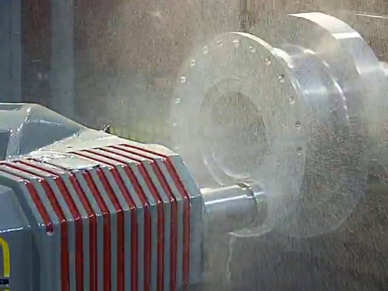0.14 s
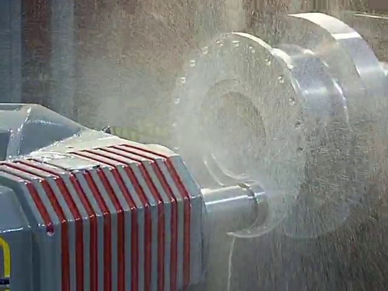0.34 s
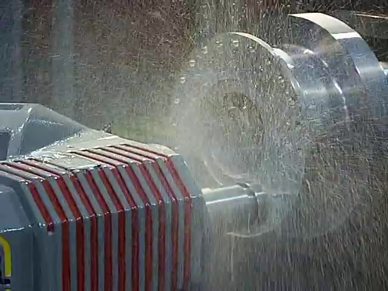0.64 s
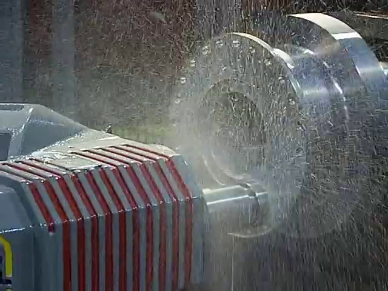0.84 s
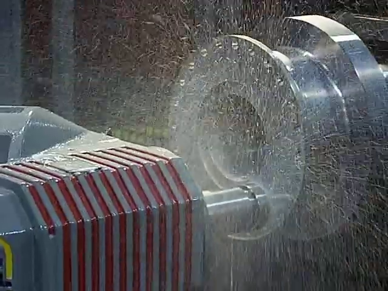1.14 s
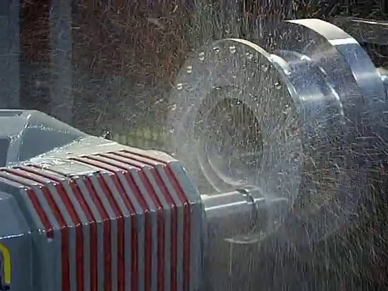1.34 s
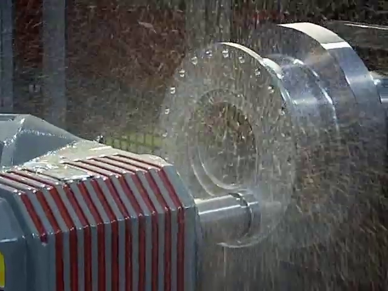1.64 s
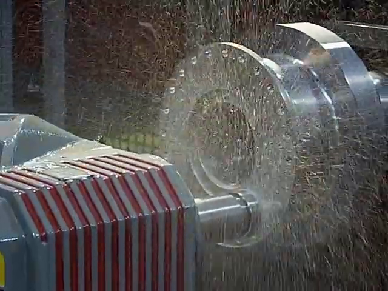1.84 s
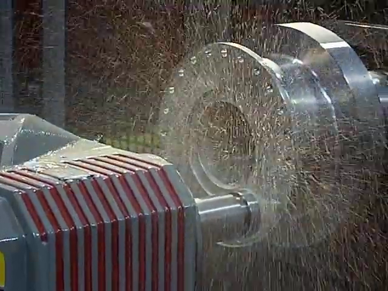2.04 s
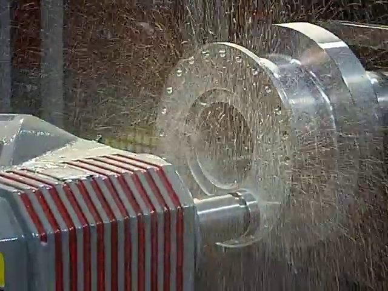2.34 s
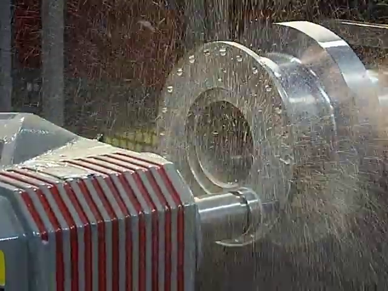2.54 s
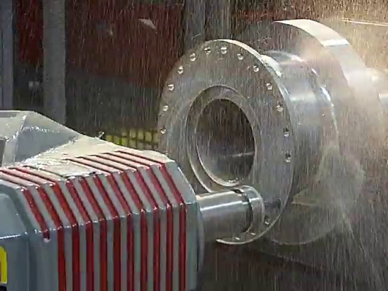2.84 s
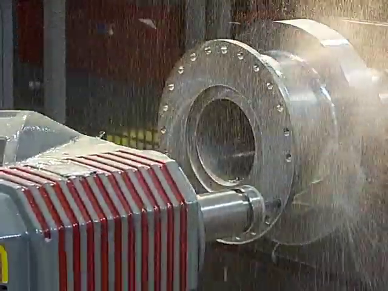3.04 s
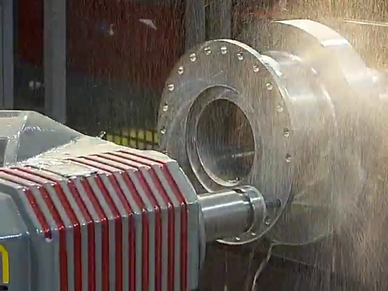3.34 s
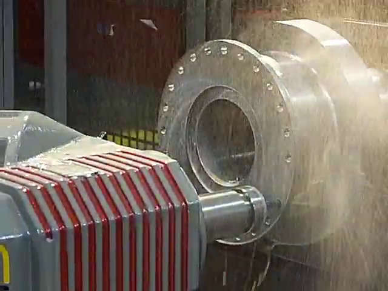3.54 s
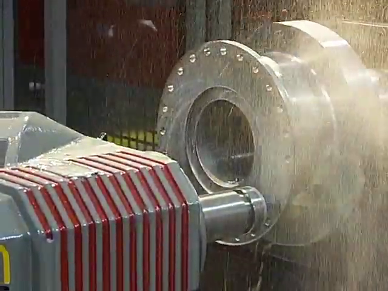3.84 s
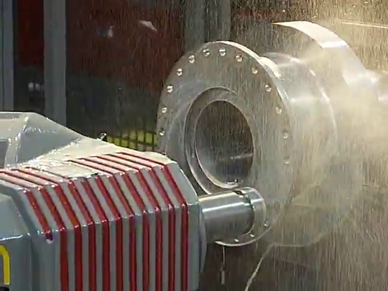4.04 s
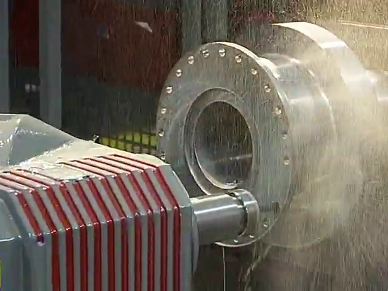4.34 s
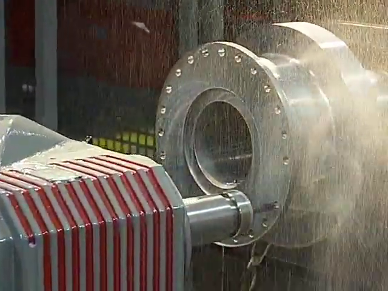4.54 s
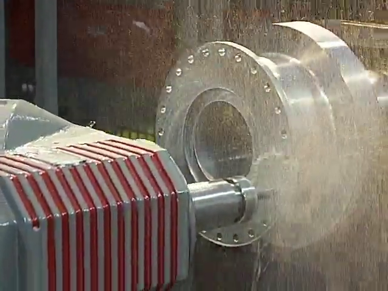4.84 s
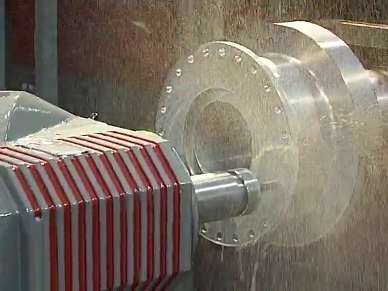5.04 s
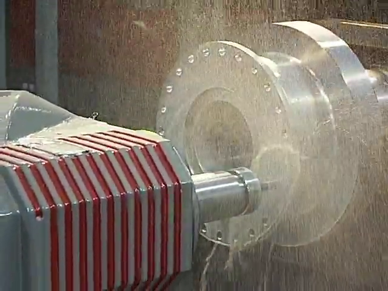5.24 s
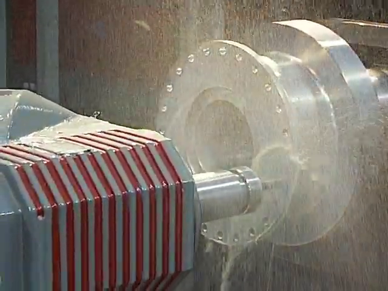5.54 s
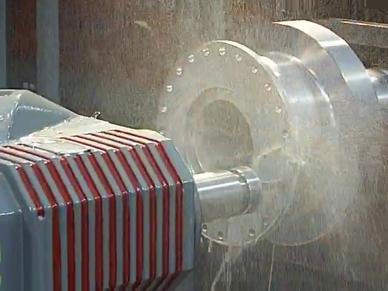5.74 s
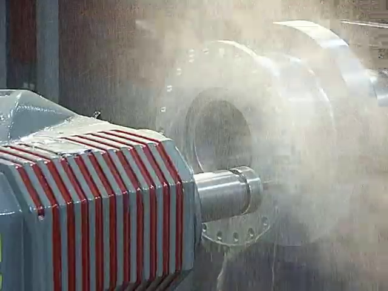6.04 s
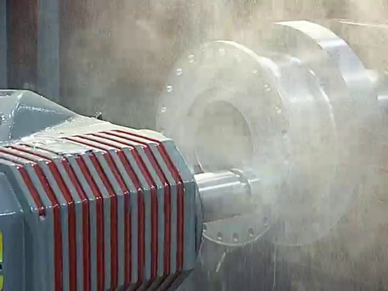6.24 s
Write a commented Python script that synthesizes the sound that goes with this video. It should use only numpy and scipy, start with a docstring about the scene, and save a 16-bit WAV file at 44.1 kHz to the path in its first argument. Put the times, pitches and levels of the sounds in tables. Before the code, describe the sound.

Close to a machining spindle in a workshop, bright coolant spray hisses over a broad roar, low thrum and steady high whine. Rough drilling tones pulse rapidly, with faint whistles early and scattered chip ticks. Just after two seconds a short metallic screech and a cluster of sharp clicks mark the breakthrough. The cutting tones vanish, motor hum emerges, and the noise later jumps much louder, falling back at the end.

```python
"""A spindle drills through a steel flange: rough cutting tones, then a screech of ringing steel as it breaks through.
Coolant spray hisses and pulses with the turning tool; edges catch and chips ping as short noise bursts into steel modes.
Behind it a drive whines, a whistle comes in bursts, and the shop roars, thrums and hums: shaped noise and wavering sines.
Noises and ringing steel pass a microphone housing with a notch and a treble peak. Puffs of air thump and dull the
steady bed, whose level wanders, rising sharply for a while in the second half."""
import sys
import numpy as np
from scipy import signal
from scipy.fft import rfft, irfft, next_fast_len
from scipy.io import wavfile

SR = 44100
rng = np.random.default_rng(int(sys.argv[2]) if len(sys.argv) > 2 else 0)


def materialize(psi):
    """Save the field psi as 16-bit PCM at rate SR to the path in sys.argv[1].

    A 1-D psi becomes a single channel; in a 2-D psi each row is a channel.
    """
    bounded = np.clip(np.atleast_2d(psi).T, -1, 1)
    quanta = np.round(bounded * 32767).astype(np.int16)
    wavfile.write(sys.argv[1], SR, quanta)


N = 281358
T = np.arange(N) / SR

# Rough tones the drill sings in the steel. Each row: pitch in Hz, level in dB before the cutting gain.
CUTTING_TONES = [(44.4, -11), (167.3, -20), (347.5, -14), (599, -12), (932, -11.5), (844, -17.5),
                 (1112, -15), (1347, -23.5), (1340, -14.5), (1512, -15.5)]
# Screech of the breakthrough. Each row: time in seconds, rms of the shrill ring in dB, rasp centre in Hz.
SCREECH_GLIDE = [(2.26, -58, 3000), (2.285, -39, 3000), (2.31, -33, 3090), (2.35, -22, 3365),
                 (2.39, -20, 3450), (2.44, -23, 3250), (2.5, -26, 3070), (2.535, -32.5, 3000),
                 (2.62, -36.5, 2920), (2.7, -60, 2850)]
# Two bursts of the rasp. Each row: centre in seconds, rms at the crest in dB, length at half height in seconds.
RASP_BURSTS = [(2.343, -39, 0.097), (2.49, -39.5, 0.14)]
# The cutting edges catch. Each row: start in seconds, peak level in dB, centre of the colour in Hz.
EDGE_CATCHES = [(2.2816, -22, 7300), (2.3081, -24, 7200), (2.3465, -17, 7000), (2.3545, -11, 7900),
                (2.377, -10, 7800), (2.3947, -7, 7900), (2.4163, -8, 8000)]
# Single chips and drops strike the guard. Each row: start in seconds, peak level in dB, centre of the colour in Hz.
CHIP_STRIKES = [(.648, -25, 7300), (1.0657, -21, 7100), (1.4726, -26, 7300), (1.7137, -22, 7300),
                (2.1441, -29, 7400), (4.2168, -14, 7400), (4.3445, -17, 7450)]
# Modes of tool and flange. Each row: pitch in Hz, relative level in the air in dB,
# time in seconds to ring down 60 dB before extra damping.
STEEL_MODES = [(5240, -4.5, .021), (6100, 0, .031), (6000, -11, .031), (6630, 1, .13), (7480, 4.5, 0.036),
               (7010, 7.5, 0.048), (6860, -7.5, 0.078), (7600, 1, 0.067), (7750, -7, 0.031),
               (7790, -2, 0.077), (8200, -16, 0.02), (8540, -3, .081), (8160, -7, 0.022), (9100, 2, .021)]
# Noise spectra in the air, only their shape counts. Each row: frequency in Hz, density in dB per Hz.
SPRAY_SPECTRUM = [(2600, -29), (4050, -2), (4650, -3.5), (5350, -4.5), (6450, -4), (7250, -7), (7750, -9.5),
                  (8250, -14.5), (8550, -13.5), (8850, -9.5), (9100, -29), (9600, -55.5)]
ROAR_SPECTRUM = [(90, -31), (200, -9), (420, 0), (650, 0), (1000, 1.5), (1300, -2), (1600, -4), (2600, -6),
                 (3400, -5), (4000, -12), (4600, -17.5), (6000, -33.5)]
THRUM_SPECTRUM = [(40, -34.5), (75, -8.5), (110, -10), (160, 0.5), (200, -8), (300, -9), (420, -16.5)]
BUFFET_SPECTRUM = [(8, -8.5), (18, 4.5), (40, 3.5), (65, -0.5), (110, -18)]
# Short spits of coolant hiss. Each row: centre in seconds, rms at the crest in dB, pitch centre in Hz,
# length at half height in seconds.
COOLANT_SPITS = [(2.222, -45, 5100, .018), (2.402, -46, 5200, .02), (2.443, -46, 5300, .01)]
# Bursts of a thin whistle. Each row: centre in seconds, crest level in dB against the roar.
WHISTLE_BURSTS = [(.545, -17), (.655, -13), (.795, -10.5), (.925, -10)]
# Motors and pumps of the shop. Each row: pitch in Hz, level in dB before the hum gain.
SHOP_HUM = [(59, -17), (78, -19), (118, -13), (152, -11), (180, -15), (240, -11), (300, -18), (327, -17),
            (358, -13), (475, -13), (712, -17), (864, -18), (985, -20), (1077, -18), (1164, -15),
            (1310, -16), (1360, -19), (1480, -21), (1500, -20), (1767, -20), (2132, -24), (2935, -23),
            (3914, -38), (4565, -38), (5545, -26)]
# Puffs of air that press on the microphone and deafen it for a moment. Each row: centre in seconds, depth in dB,
# width at half depth in seconds.
AIR_PUFFS = [(1.059, 7, .012), (1.205, 4, 0.019), (1.333, 4.5, 0.019), (1.405, 4, 0.02), (1.463, 4.5, .025),
             (1.56, 0, 0.018), (1.664, 4, .02), (1.788, 8, 0.042), (1.855, 6, 0.029), (1.905, 8, 0.026),
             (1.957, 5, 0.016), (2.002, 6, 0.023), (2.058, 2, 0.016), (2.26, 4, 0.037), (3.75, 1.5, .03),
             (4.158, 3, .025), (4.39, 3, 0.025), (4.46, 1, 0.019), (4.55, 2.5, 0.018), (4.74, 3.5, 0.034),
             (5.05, 0.5, 0.021), (5.992, 4, 0.025)]
# Balance of the bed. Each row: time in seconds, then spray, whine and thrum in dB against the roar.
BALANCE = [(0, 1.5, -5, -8), (1, 4.5, -7.5, -6.5), (1.6, 4, -5.5, -10.5), (2.3, 4.5, -6, -12),
           (2.6, 3, -4, -9.5), (4.3, 4, -3, -5.5), (5, 3, -7, -4.5), (5.6, 2.5, -5, -6),
           (6.38, 1.5, -6, -14.5)]
# Slow level of the steady bed. Each row: time in seconds, level of the roar in dB.
BED_LEVEL = [(0, -40), (.1, -42), (.85, -42), (1.4, -42.5), (1.6, -45), (1.95, -42), (2.2, -39),
             (2.4, -40.5), (2.52, -39), (3.43, -39.5), (3.62, -29.5), (4.65, -30), (4.85, -28),
             (6.235, -28), (6.25, -38), (6.322, -35), (6.334, -42), (6.38, -42.5)]
# Throb of the bed, twice a turn. Each row: time in seconds, depth in dB (negative turns it over).
THROB_DEPTH = [(0, 2), (.7, 0.6), (1.05, 1.5), (1.3, -0.5), (1.5, 3.5), (1.76, 3.5), (1.9, 1), (2.3, 0.3),
               (6.38, 0.5)]

SPINDLE_HZ, THROB_START_S = 23.27, 0.03
# The drill cuts until it breaks through; then its tones die and the shop hum stands out.
THROUGH_S, THROUGH_FADE_S = 2.45, 0.16
CUTTING_DB, HUM_CUTTING_DB, HUM_FREE_DB = -0.5, -4, -1
# A lighter graze comes just before each catch.
GRAZE_LEAD_S, GRAZE_DB, GRAZE_HZ = 0.004, -7, 7250
# Jets from the drill tip sweep round about once a turn: depth in the spray, phase in radians.
SWEEP_HZ, SWEEP_PHASE, SWEEP_DB = 23.33, -2.8, 1
WHINE_HZ, WHINE_OCTAVE_DB = 2897.9, -17  # octave against the fundamental
WHISTLE_HZ, WHISTLE_S = 2248, 0.09
BUFFET_DB = -17  # against the roar
# Gain for a puff 1 dB deep, and the band in which its thump is heard.
THUMP_DB, THUMP_BOTTOM_HZ, THUMP_TOP_HZ = -53, 7, 40
FLUTTER_DB, FLUTTER_HZ = 0.58, 14
NOTCH_HZ, NOTCH_WIDTH_HZ, PEAK_HZ, PEAK_WIDTH_HZ = 4200, 150, 7550, 1100
CUTOFF_HZ = 9330


def from_db(db):
    """Decibels to gain."""
    return np.exp(np.asarray(db) * (np.log(10) / 20))


def rms_one(x):
    """Scale to rms 1."""
    return x / np.sqrt(np.mean(x ** 2) + 1e-20)


def in_time(rows):
    """Columns of a table as curves, one value a sample."""
    s, *columns = np.transpose(rows)
    return [np.interp(T, s, column) for column in columns]


def bell(s, width):
    """A bump in time, as wide as given at half its height."""
    out = np.zeros(N)
    near = slice(max(round((s - 3 * width) * SR), 0), round((s + 3 * width) * SR))
    out[near] = np.exp(-4 * np.log(2) * ((T[near] - s) / width) ** 2)
    return out


def drift(rate_hz):
    """Slow random curve of spread 1: smoothed noise at every 40th sample, joined by straight lines."""
    r = np.exp(-80 * np.pi * rate_hz / SR)
    raw = rng.standard_normal(N // 40 + 2002)
    slow = signal.lfilter([1], [1, -2 * r, r * r], raw)[2000:]  # the filter has settled
    slow = rms_one(slow - slow.mean())
    between = slow[:-1, None] + np.diff(slow)[:, None] * np.arange(40) / 40
    return between.ravel()[:N]


def root_pair(hz, width_hz):
    """A pair of poles or zeros, gain 1 at zero frequency."""
    r = np.exp(-np.pi * width_hz / SR)
    pair = np.array([1, -2 * r * np.cos(2 * np.pi * hz / SR), r * r])
    return pair / pair.sum()


def housing(x):
    """The cavity before the microphone cancels one band and lifts a higher one."""
    return signal.lfilter(root_pair(NOTCH_HZ, NOTCH_WIDTH_HZ), root_pair(PEAK_HZ, PEAK_WIDTH_HZ), x)


def tone(hz, wobble, waver_hz):
    """A sine, rms 1 before its level wobbles (as a share); its pitch wavers too."""
    cycles = np.cumsum(hz + waver_hz * drift(2.727)) / SR + rng.random()
    phase = (2 * np.pi * (cycles - np.floor(cycles))).astype(np.float32)
    return np.sqrt(2) * np.sin(phase) * (1 + wobble * drift(4.0))


def noise(spectrum, patchy_db, rate_hz, count, grain_db=0):
    """Noise of a spectrum in overlapping bands that flicker each on their own; rms 1 at the microphone."""
    size = next_fast_len(N)
    log_hz = np.log(np.arange(size // 2 + 1) * SR / size + 1e-3)
    hz, db = np.transpose(spectrum)
    grain = from_db(grain_db * rng.standard_normal(size))  # sample by sample unevenness
    white = rng.standard_normal(size) * grain
    shaped = rfft(white) * from_db(np.interp(log_hz, np.log(hz), db, -120, -120))
    place = np.interp(log_hz, np.log(hz[[0, -1]]), [0, count - 1])
    total = 0
    for k in range(count):
        share = np.clip(1 - abs(place - k), 0, 1)
        band = irfft(shaped * share, size)[:N]
        total = total + band * from_db(patchy_db * drift(rate_hz))
    return rms_one(housing(total))


def noise_band(hz, half_width_hz):
    """Noise round a centre that may move; rms 1."""
    lowpass = signal.butter(4, half_width_hz, fs=SR, output="sos")
    wobble = signal.sosfilt(lowpass, rng.standard_normal((2, N)))
    phase = 2 * np.pi * np.cumsum(hz + np.zeros(N)) / SR
    return rms_one(wobble[0] * np.cos(phase) + wobble[1] * np.sin(phase))


def steel(clicks, damping=1.0):
    """Clicks set the modes of the steel ringing, damping shortens them; heard at the microphone."""
    out = 0
    for k, (hz, db, t60) in enumerate(STEEL_MODES):
        r = from_db(-60 * damping / (t60 * SR))
        w = 2 * np.pi * hz / SR
        poles = [1, -2 * r * np.cos(w), r * r]
        ring = signal.lfilter([np.sin(w) / 2, 0, -np.sin(w) / 2], poles, clicks + 1e-18)
        out = out + (-1) ** k * from_db(db) * ring  # signs alternate from mode to mode
    return housing(out)


def blows(events, contact_s, damping, spread):
    """Each blow is a dying burst of contact noise into the steel, coloured by a band and scaled to its peak."""
    out, size = np.zeros(N), 1500
    decay = np.exp(-np.arange(size) / (contact_s * SR))
    fade = np.hanning(2 * size)[size:]
    for s, db, hz in events:
        burst = rng.standard_normal(size) * decay
        colour = signal.butter(2, [hz / spread, hz * spread], "band", fs=SR, output="sos")
        ring = signal.sosfilt(colour, steel(burst, damping)) * fade
        start = round(s * SR)
        out[start:start + size] += from_db(db) * ring / abs(ring).max()
    return out


def cutting(load):
    """The loaded drill sings in the steel on rough, wavering tones that die as the load goes."""
    tones = sum(from_db(db) * tone(hz, 0.3, 6.0) for hz, db in CUTTING_TONES)
    return from_db(CUTTING_DB) * load * tones


def screech():
    """Dense uneven slips of the cutting edges ring the steel, over a lower, gliding, broken rasp."""
    shrill_db, rasp_hz = in_time(SCREECH_GLIDE)
    span = slice(round(SCREECH_GLIDE[0][0] * SR), round(SCREECH_GLIDE[-1][0] * SR))
    sizes_db = 2.0 * np.minimum(rng.exponential(1, N), 4)
    slips = (rng.random(N) < 0.15) * from_db(sizes_db) * rng.choice([-1, 1], N)
    shrill = np.zeros(N)
    shrill[span] = rms_one(steel(slips[span], damping=2.5))
    shrill = shrill * from_db(1.5 * drift(90))
    rasp = noise_band(rasp_hz, 300) * from_db(2.5 * drift(90))
    rasp_gain = sum(from_db(db) * bell(s, length) for s, db, length in RASP_BURSTS)
    return from_db(shrill_db) * shrill + rasp_gain * rasp


def catches():
    """The cutting edges catch in heavily damped steel, each time after a lighter graze."""
    grazes = [(s - GRAZE_LEAD_S, db + GRAZE_DB, GRAZE_HZ) for s, db, hz in EDGE_CATCHES]
    return blows(EDGE_CATCHES + grazes, contact_s=0.00053, damping=7.9, spread=1.12)


def chips():
    """Chips and drops strike the guard: shorter contacts, dull ringing, wider colour."""
    return blows(CHIP_STRIKES, contact_s=0.0004, damping=11.0, spread=1.5)


def spray(spray_db):
    """Grainy coolant hiss that swells as the jets sweep round and flickers quickly."""
    sweep_db = SWEEP_DB * np.cos(2 * np.pi * SWEEP_HZ * T + SWEEP_PHASE)
    gain = from_db(spray_db + sweep_db + 0.89 * drift(55))
    return gain * noise(SPRAY_SPECTRUM, patchy_db=0.82, rate_hz=11, count=6, grain_db=3.0)


def spits():
    """The coolant spits short bumps of narrow hiss, each moved up to its own pitch."""
    hiss = noise_band(0, 380)
    out = np.zeros(N)
    for s, db, hz, length in COOLANT_SPITS:
        carrier = np.sqrt(2) * np.cos(2 * np.pi * hz * T)
        out += from_db(db) * bell(s, length) * hiss * carrier
    return out


def whine():
    """The drive whines on a nearly steady tone with a weak octave."""
    octave = tone(2 * WHINE_HZ, 0.1, 0.19)
    return tone(WHINE_HZ, 0.063, 0.21) + from_db(WHINE_OCTAVE_DB) * octave


def whistle():
    """One thin wavering sine, opened in short bell-shaped bursts."""
    gain = sum(from_db(db) * bell(s, WHISTLE_S) for s, db in WHISTLE_BURSTS)
    return gain * tone(WHISTLE_HZ, 0.2, 5.0)


def roar():
    """Broad, even noise of the shop: the reference for the balance."""
    return noise(ROAR_SPECTRUM, patchy_db=0.2, rate_hz=12, count=8)


def thrum():
    """Low noise that swells slowly and unevenly from band to band."""
    return noise(THRUM_SPECTRUM, patchy_db=2.7, rate_hz=1.7, count=3)


def buffet():
    """The lowest noise, buffeting unevenly."""
    return from_db(BUFFET_DB) * noise(BUFFET_SPECTRUM, patchy_db=2.0, rate_hz=3, count=2)


def hum(load):
    """Motors and pumps sound as many wavering sines, stronger once the drill is through."""
    gain = from_db(HUM_FREE_DB + (HUM_CUTTING_DB - HUM_FREE_DB) * load)
    return gain * sum(from_db(db) * tone(hz, 0.3, 2.5) for hz, db in SHOP_HUM)


def pressure():
    """How hard the air presses on the microphone, as dB of deafening."""
    return sum(depth_db * bell(s, width) for s, depth_db, width in AIR_PUFFS)


def thumps():
    """The air pressure itself, heard in a low band as soft thumps."""
    band = signal.butter(1, [THUMP_BOTTOM_HZ, THUMP_TOP_HZ], "band", fs=SR, output="sos")
    return from_db(THUMP_DB) * signal.sosfilt(band, pressure())


def level():
    """Gain of the steady bed: slow level, throb twice a turn, deafening by puffs and a common flutter."""
    slow_db, = in_time(BED_LEVEL)
    depth_db, = in_time(THROB_DEPTH)
    throb_db = -depth_db * np.cos(4 * np.pi * SPINDLE_HZ * (T - THROB_START_S))
    return from_db(slow_db + throb_db - pressure() + FLUTTER_DB * drift(FLUTTER_HZ))


def scene():
    """The steady bed under its level, with the screech, blows, spits and thumps on top."""
    load = np.clip(1 - (T - THROUGH_S) / THROUGH_FADE_S, 0, 1)  # 1 cutting, 0 through
    spray_db, whine_db, thrum_db = in_time(BALANCE)
    steady = cutting(load) + spray(spray_db)
    steady += from_db(whine_db) * whine() + whistle()
    steady += roar() + from_db(thrum_db) * thrum() + buffet() + hum(load)
    sudden = screech() + catches() + chips() + spits() + thumps()
    return (level() * steady + sudden)[None]


def record(dry):
    """The top is cut steeply."""
    return signal.sosfilt(signal.cheby2(16, 70, CUTOFF_HZ, fs=SR, output="sos"), dry)


dry = scene()
out = record(dry)
materialize(out)
```